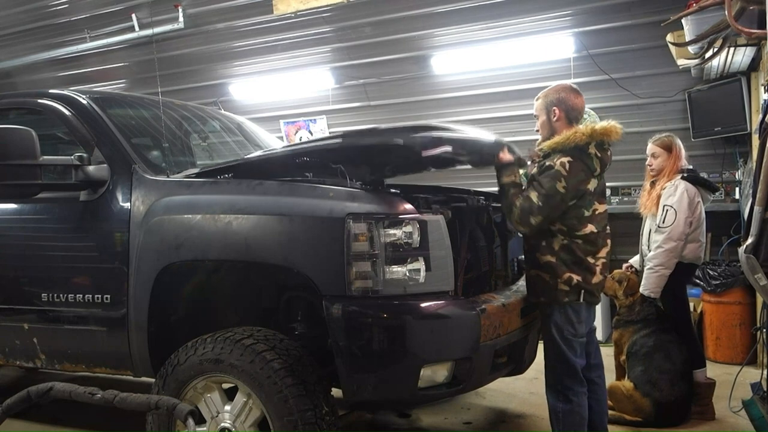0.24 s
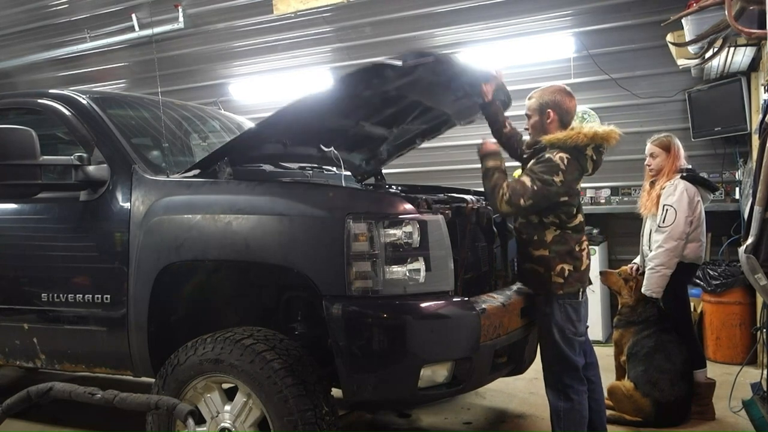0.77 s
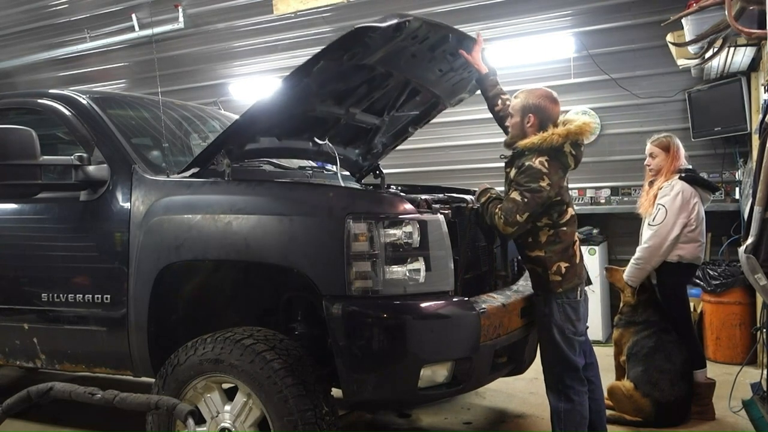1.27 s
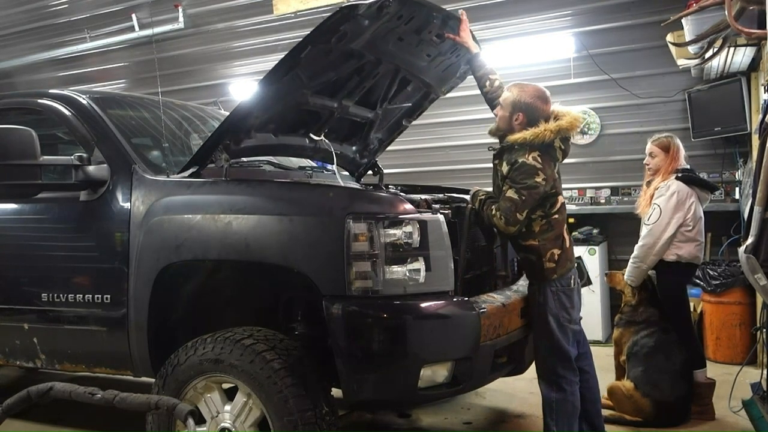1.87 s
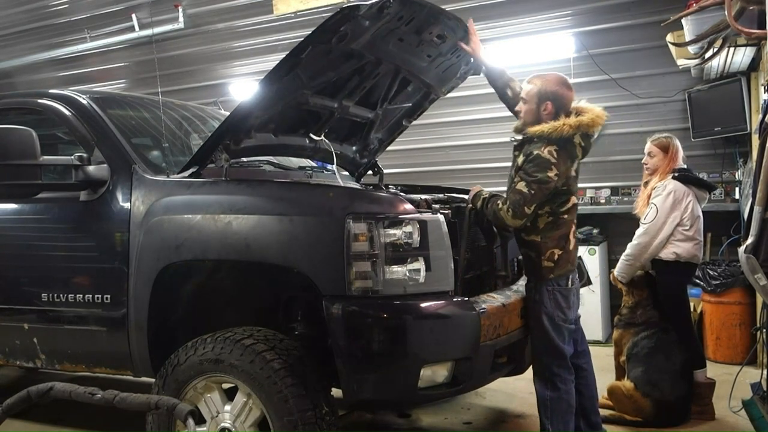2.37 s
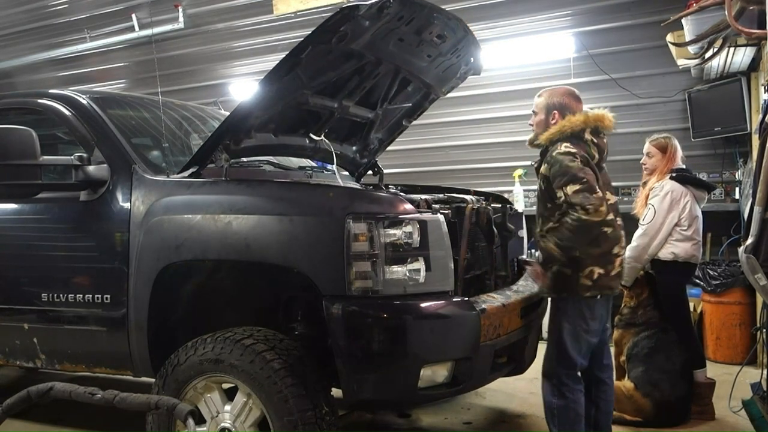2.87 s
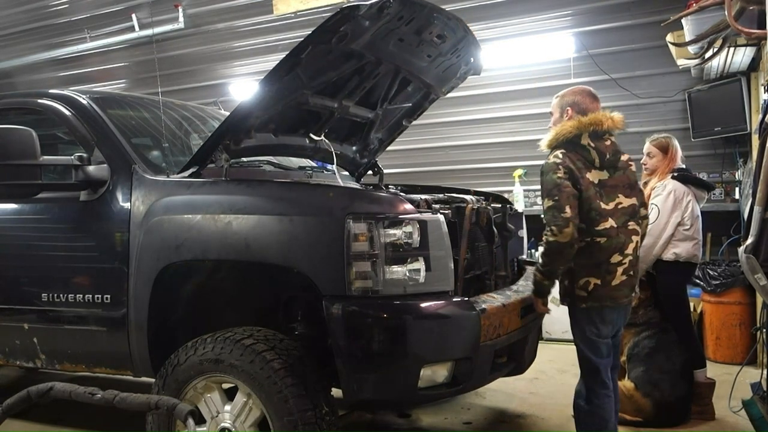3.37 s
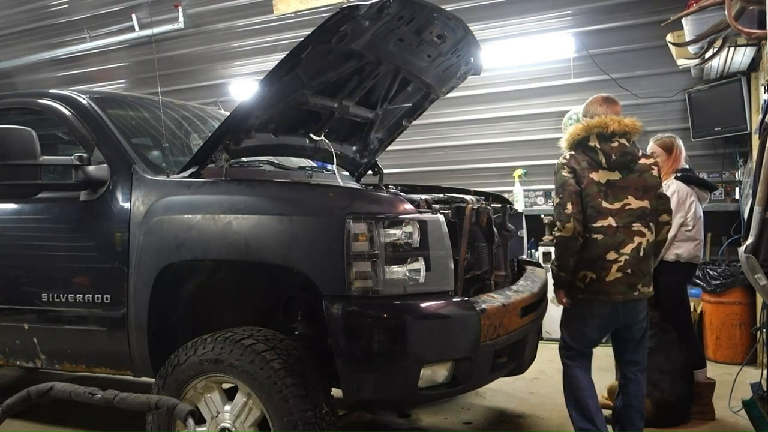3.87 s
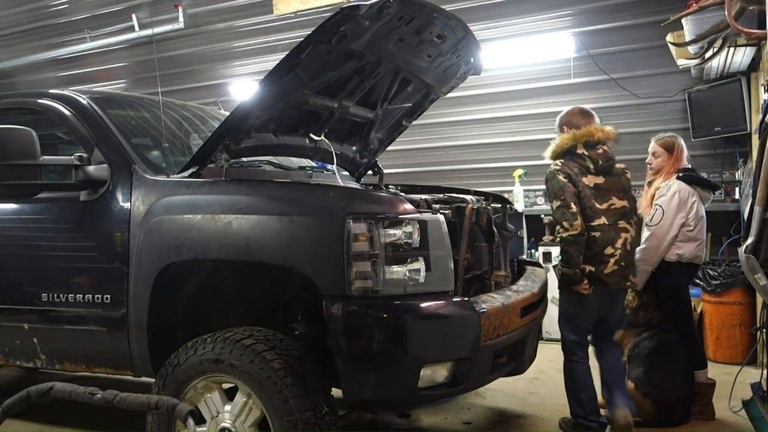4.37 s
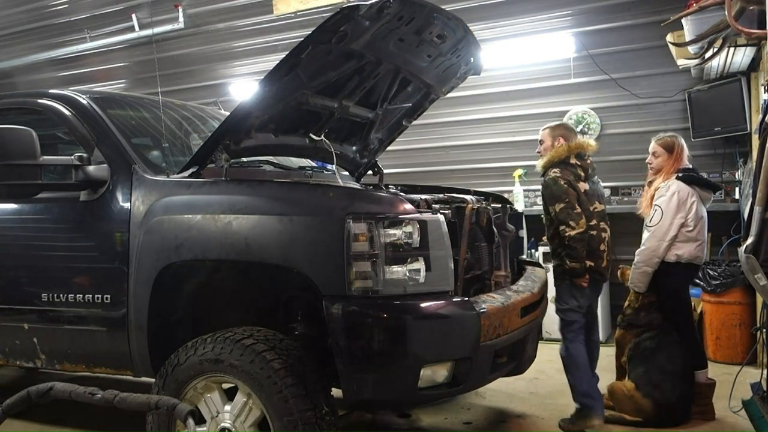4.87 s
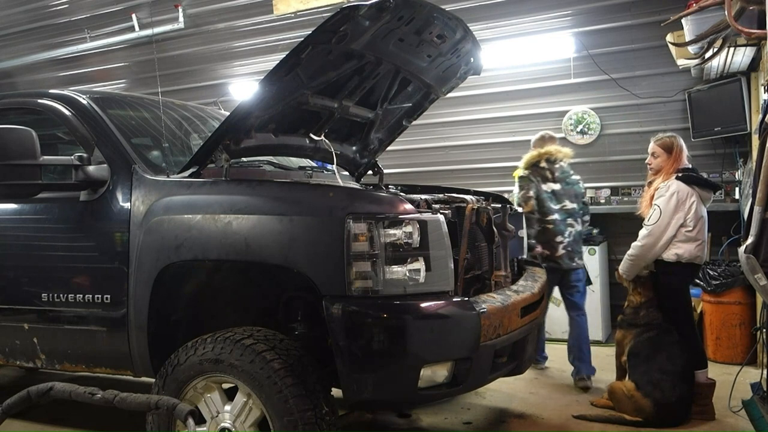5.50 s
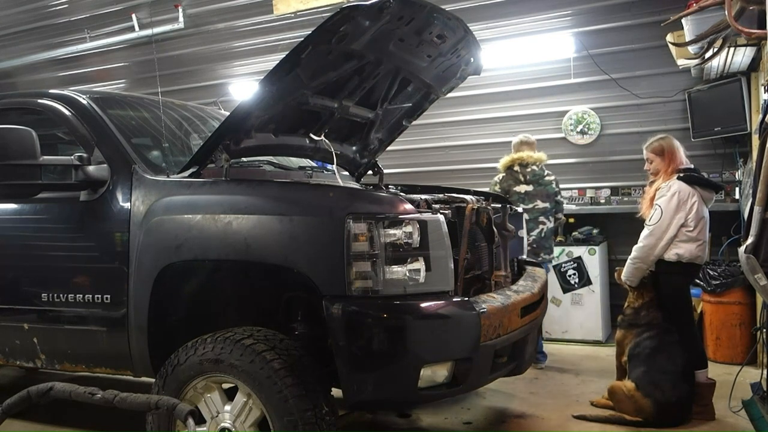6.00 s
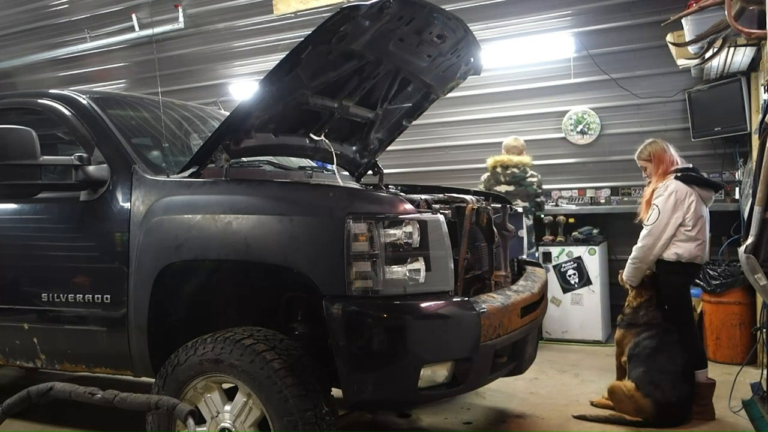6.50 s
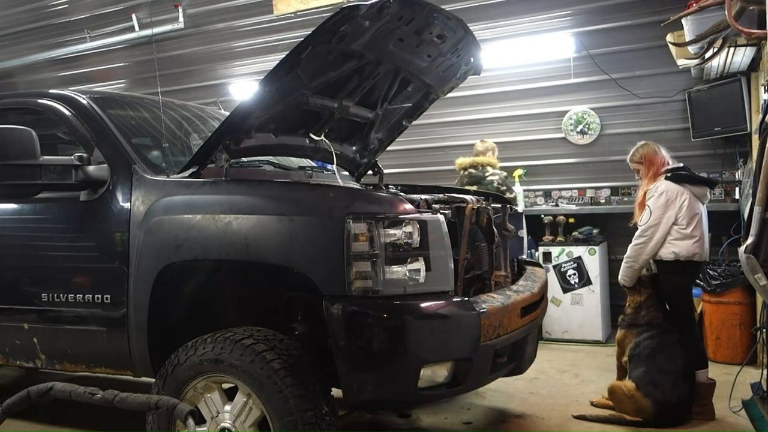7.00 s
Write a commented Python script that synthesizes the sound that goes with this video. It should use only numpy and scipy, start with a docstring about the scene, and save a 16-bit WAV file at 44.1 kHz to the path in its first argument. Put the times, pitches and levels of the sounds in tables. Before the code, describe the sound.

A sharp metallic clack opens a truck's hood over the low, pulsing hum and airy rush of a garage fan. Faint jacket rustling and a muffled bump from the hinges follow, then light, uneven footsteps on concrete. Finally comes a quick scrape, a rattle of metal tools and a loud bouncing knock on a workbench. Everything sounds somewhat distant in stereo, with a short echo off the metal walls.

```python
"""A metal-lined garage, heard through a two-port stereo microphone, with more room than direct sound.
A fan rushes, booms and whines through its housing while its motor hums against the mains.
A truck's hood latch lets go with a clack and the hood swings up to a dull stop. A jacket rustles and
shoes scuff over the concrete to a workbench, where something is dragged, tools clink and rattle,
and something heavy is set down and bounces. Each blow or scrape rings a body, then the garage."""
import sys
import numpy as np
from scipy import signal
from scipy.fft import rfft, irfft, next_fast_len
from scipy.io import wavfile
from scipy.ndimage import uniform_filter1d, minimum_filter1d

SR = 44100
rng = np.random.default_rng(int(sys.argv[2]) if len(sys.argv) > 2 else 0)


def unload_audio(sound):
    """Save the sound as a 16-bit wav file, at the path given as the first command line argument."""
    columns = np.transpose(np.atleast_2d(sound))
    # keep every value between -1 and 1, then stretch to whole-number steps
    steps = np.round(np.clip(columns, -1, 1) * 32767)
    wavfile.write(sys.argv[1], SR, steps.astype(np.int16))


N = 319725

# the fan's rush of air: frequency_hz, gain_db
AIR_SPECTRUM = [(30, -23), (50, -11), (64, -2), (76, 3.5), (112, -5.5), (165, -5), (195, -13.5),
                (265, -17.5), (400, -9), (640, -23.5), (1100, -19), (1450, -25), (2600, -28), (4700, -47)]
# resonances of the fan and its housing: pitch_hz, width_hz, gain_db
HOUSING_MODES = [(156, 20, 6), (221.6, 20, 8), (294, 13.7, 11), (315.5, 43, 12.5), (430, 14, 4.5),
                 (552, 32.4, 12), (717, 69, 12.5), (984, 157, 4.5), (1260, 13, 10.5), (1647, 46, 4),
                 (3327, 42, 10)]
# slow course of the fan's boom and of its whine: time_s, level_db
BOOM_LEVELS = [(0, -32), (2.15, -33), (2.4, -37.5), (3.9, -36), (4.15, -29.5), (4.7, -32.5), (6.25, -31.5),
               (6.4, -24.5), (6.55, -32.5), (7.25, -30.5)]
WHINE_LEVELS = [(0, -59), (1.2, -63), (1.75, -57.5), (2.2, -60), (2.7, -56.5), (5.2, -56.5), (6.2, -62),
                (7.25, -65)]
# motor hum, on the mains and on the shaft speed: harmonic_number, level_db
MAINS_HARMONICS = [(1, -35.6), (2, -49.8)]
SHAFT_HARMONICS = [(1, -36.3), (3, -47.6), (4, -50), (5, -42.5), (8, -53)]
# the microphone's own hiss: frequency_hz, gain_db
HISS_SPECTRUM = [(1000, -0.5), (8000, -13.5), (12000, -6), (15500, -4.5)]

# blows: start_s, level_db, contact_s, tilt_db_per_octave
LATCH_BLOWS = [(.0478, -18, 0.0093, 4), (.054, -19.5, .003, 1.5), (.065, -20.5, 0.0018, -4.5),
               (.077, -20, 0.007, -7.5), (.121, -31, 0.0031, 1), (.19, -38, 0.016, -8.5),
               (.435, -32, 0.012, -18.5)]  # in latch and hood
THUMP_BLOWS = [(1.85, -31, 0.05, -1), (4.505, -35, .0005, -2), (4.866, -37, 0.00088, 0)]  # the hinges at their stop, then two heels
CLINK_BLOWS = [(6.841, -33, 0.0049, -2)]  # a small metal tool
RATTLE_BLOWS = [(6.843, -28, 0.01, -0.5), (6.885, -33, 0.0079, -1), (6.9285, -24, .003, -0.5),
                (6.968, -25, 0.018, 0.5), (7.0, -30, .006, 0.5)]  # tools against each other
BENCH_BLOWS = [(7.0405, -16.5, 0.0035, 1), (7.048, -19.5, .002, 1.5), (7.078, -20, .004, 0.5),
               (7.095, -22, 0.0014, 0)]  # something heavy on the bench
# moves of the arms in a winter jacket: middle_s, level_db, length_s
ARM_MOVES = [(.4, -59, 0.91), (1.2, -63, .6), (2.57, -61, 0.51), (2.87, -62, .2), (3.38, -58, .16),
             (4.58, -54, 0.22), (4.98, -59, .3)]
# soles on concrete: start_s, level_db, slide_s, tilt_db_per_octave, rasp_hz
SCUFFS = [(3.083, -39, 0.013, -4, 2580), (3.125, -40.5, 0.005, -3, 2180), (3.604, -43.5, 0.012, -2.5, 2570),
          (4.163, -37, 0.019, -0.5, 2500), (4.228, -38.5, 0.0077, -5.5, 2310),
          (4.42, -49.5, 0.0019, -4.5, 2900), (4.578, -41, 0.0025, -8, 1930), (5.0, -51, 0.0066, -6.5, 3050),
          (5.406, -36.5, 0.01, 2.5, 2190), (5.495, -43.5, 0.0021, -3, 1200),
          (5.635, -51.5, 0.0098, -1, 2600), (6.036, -36.5, 0.01, 1, 2850), (6.08, -40, 0.011, -0.5, 2700)]
# something dragged on the bench: start_s, level_db, slide_s, tilt_db_per_octave
DRAG_SLIDES = [(6.585, -48, 0.009, 9), (6.607, -35.5, 0.0021, 4), (6.622, -26.5, 0.009, 0),
               (6.668, -28, 0.0031, -3.5)]

# broad colour of each thing struck or rubbed: frequency_hz, gain_db
HOOD_SPECTRUM = [(120, -18), (280, -10), (460, 0), (620, -8), (850, -11), (1200, -1), (1900, -5),
                 (2700, -14), (3600, -22.5), (4600, -29), (8000, -43), (15500, -53)]
CLOTH_SPECTRUM = [(1000, -10), (3000, 4), (6000, -3), (9000, 0), (15000, -1)]
THUMP_SPECTRUM = [(100, -17), (300, 10.5), (700, -1), (1300, -7.5), (3000, -27), (15500, -69)]
SOLE_SPECTRUM = [(150, -29), (500, -14.5), (1000, -11.5), (1500, -7.5), (2000, -5), (2900, -5.5),
                 (3900, -10.5), (5500, -13.5), (8000, -16.5), (11000, -20), (15500, -24)]
DRAG_SPECTRUM = [(200, -11), (520, -7), (900, -9.5), (1450, -11), (1650, -4.5), (2000, 0.5), (2550, -1),
                 (3200, -6.5), (3650, -7.5), (4300, -12), (7000, -20), (10000, -28), (15500, -34)]
CLINK_SPECTRUM = [(1000, -11), (2800, 6), (5500, -9), (9000, -15), (15500, -14)]
RATTLE_SPECTRUM = [(150, -11), (350, 3), (700, -5.5), (950, -5), (2000, -4.5), (2800, -8), (3800, -17),
                   (6000, -26.5), (10000, -31.5), (15500, -31)]
BENCH_SPECTRUM = [(120, -9), (250, -6), (380, 2.5), (750, 0), (1100, -0.5), (2000, -2.5), (2700, -7),
                  (3400, -20.5), (4200, -21), (6500, -30), (10000, -33), (15500, -34)]
# resonances standing on those colours: pitch_hz, width_hz, gain_db
HOOD_RESONANCES = [(308, 29, 12), (423, 13, 4), (469, 35, 5), (1166, 29, 9), (1420, 34, 4), (1590, 30, 5),
                   (1665, 48, 8.5), (1760, 87, 4), (1886, 30, 7.5), (2140, 95, 9.5), (2380, 44, 4),
                   (2630, 32, 10.5), (2700, 62, 13), (2850, 40, 4), (3280, 75, 8), (3490, 91, 10.5),
                   (3640, 60, 7)]
CLINK_RESONANCES = [(4500, 590, 13), (7760, 750, 15), (10700, 1000, 13)]
RATTLE_RESONANCES = [(1200, 70, 5), (1330, 90, 7), (1925, 56, 6)]
BENCH_RESONANCES = [(355, 19, 8.5), (385.4, 12, 10.5), (527, 26, 5.5), (716, 75, 10.5), (830, 24, 5),
                    (922, 27, 3), (1233, 27, 1), (1670, 40, 2.5), (1945, 190, 6), (3230, 80, 10)]

# the garage's reverberation time: frequency_hz, t60_s
GARAGE_DECAY = [(150, 0.42), (500, 0.68), (1400, 0.52), (3500, 0.59), (8000, 0.55), (15000, 0.62)]
# unshared against shared sound at the two ports: frequency_hz, side_over_mid_db
PORT_SPREAD = [(60, -81), (150, -39.5), (320, -20), (700, -15.5), (1400, -10.5), (2600, -10.5), (4500, 1.5),
               (9000, -4), (15000, 10)]
# the ports' unequal sensitivity: frequency_hz, left_over_right_db
PORT_BALANCE = [(700, 0.3), (1400, -0.3), (2600, -1.4), (4000, -4.5), (8000, -0.5), (14000, 0.7)]


def from_db(db):
    return 10 ** (np.asarray(db) / 20)


def unit_rms(x):
    return x / np.sqrt(np.mean(x ** 2) + 1e-20)


def curve_at(points, hz):
    """Joins (frequency_hz, value) points on a log-frequency axis."""
    point_hz, value = np.transpose(points)
    return np.interp(np.log(hz + 1), np.log(point_hz + 1), value)


def slow_gain(levels):
    """Joins (time_s, level_db) points into a gain for every sample."""
    return from_db(np.interp(np.arange(N) / SR, *np.transpose(levels)))


def body_db(spectrum, modes, hz):
    """A broad spectrum with resonance peaks standing on it."""
    peaks_db = sum(db / (1 + (2 * (hz - pitch) / width) ** 2) for pitch, width, db in modes)
    return curve_at(spectrum, hz) + peaks_db


def diffuse(gain_db=lambda hz: 0, size=N):
    """Noise from all around, as two close ports hear it: alike in the bass, apart in the treble."""
    padded = next_fast_len(size)
    hz = np.fft.rfftfreq(padded, 1 / SR)
    mid, side = rfft(rng.standard_normal((2, padded)))
    spread = from_db(curve_at(PORT_SPREAD, hz))
    ports = np.array([mid + spread * side, mid - spread * side]) / np.sqrt(1 + spread ** 2)
    return irfft(ports * from_db(gain_db(hz)), padded)[:, :size]


def narrow_band(pitch_hz, width_hz):
    """Turbulence heard through one resonance, at rms 1; it swells and sinks by chance."""
    return unit_rms(diffuse(lambda hz: -20 * np.log10(1 + (2 * (hz - pitch_hz) / width_hz) ** 2)))


def fan(level_db=-30, rolloff_hz=6500):
    """Air rushes through the resonant housing and dies away in the top octaves."""
    def colour_db(hz):
        return body_db(AIR_SPECTRUM, HOUSING_MODES, hz) - 10 * np.log10(1 + (hz / rolloff_hz) ** 4)
    return from_db(level_db) * unit_rms(diffuse(colour_db))


def fan_boom():
    """Turbulent air feeds the fan's deepest resonance, which flutters about its slow level."""
    band = narrow_band(pitch_hz=148.7, width_hz=16)
    running_rms = np.sqrt(uniform_filter1d(band[0] ** 2, size=16000))
    return band / running_rms * slow_gain(BOOM_LEVELS)


def fan_whine():
    """A thin, fuzzy whistle from the running machine; it comes up after the hood and sinks again."""
    return narrow_band(pitch_hz=2564, width_hz=37) * slow_gain(WHINE_LEVELS)


def motor(mains_hz=60.02, shaft_hz=56.89, in_phase_s=0.299):
    """The shaft slips a little behind the mains, so their two hums beat three times a second."""
    t = np.arange(N) / SR - in_phase_s
    hum = np.zeros(N)
    for hz, harmonics in [(mains_hz, MAINS_HARMONICS), (shaft_hz, SHAFT_HARMONICS)]:
        for number, level_db in harmonics:
            hum += np.sqrt(2) * from_db(level_db) * np.cos(2 * np.pi * number * hz * t)
    return hum


def microphone_hiss(level_db=-57.5):
    """The microphone's own faint, steady noise."""
    return from_db(level_db) * unit_rms(diffuse(lambda hz: curve_at(HISS_SPECTRUM, hz)))


def strike(contact_s, chatter=0.21, bounces_per_s=2500, size=8192):
    """The force of one sharp impact, then of loose parts chattering to rest."""
    t = np.arange(size) / SR
    bounces = rng.standard_normal(size) * (rng.random(size) < bounces_per_s / SR)
    return (t == 0) + chatter * bounces * np.exp(-t / contact_s)


def ring(force, spectrum, modes, tilt, size=16384):
    """A force rings a body; harder contact tilts its colour brighter, in dB per octave."""
    hz = abs(np.fft.fftfreq(size, 1 / SR))
    octaves = np.log2(np.maximum(hz, 250) / 2000)  # pivots at 2 kHz, flat below 250 Hz
    gain = from_db(body_db(spectrum, modes, hz) + tilt * octaves)
    minimum_phase = np.exp(np.conj(signal.hilbert(np.log(gain))))
    response = np.fft.ifft(minimum_phase).real
    return signal.fftconvolve(force, response[:size // 2])


def garage(sound, direct_db, early_db=3, early_s=0.046):
    """Direct sound, early returns from floor and truck, then a dense tail from the metal walls."""
    hz, t, noise = signal.stft(diffuse(size=32768), SR, nperseg=256)
    fade_db = early_db * np.exp(-t / early_s) - 60 * t / curve_at(GARAGE_DECAY, hz)[:, None]
    tail = signal.istft(noise * from_db(fade_db), SR, nperseg=256)[1]
    response = tail / np.linalg.norm(tail[0])
    direct = from_db(direct_db)  # against the tail: lower sounds farther from the microphone
    response[1, 0] += direct  # sources on the right reach that port first
    response[0, 1] += direct
    return signal.fftconvolve(sound[None], response, axes=1)


def play(events, force, spectrum, modes, direct_db):
    """Each event rings a body in the garage; its level is its energy spread over a tenth of a second."""
    mix = np.zeros((2, N))
    for start_s, level_db, duration_s, tilt in events:
        sound = garage(ring(force(duration_s), spectrum, modes, tilt), direct_db)
        size = sound.shape[1]
        sound = from_db(level_db) * unit_rms(sound) * np.sqrt(0.1 * SR / size)
        span = mix[:, round(start_s * SR):][:, :size]
        span += sound[:, :span.shape[1]]
    return mix


def hood():
    """Well off the microphone, the latch lets go and its blows ring the truck's hood."""
    return play(LATCH_BLOWS, strike, HOOD_SPECTRUM, HOOD_RESONANCES, direct_db=-18.5)


def jacket(crinkle_db=2.5, stir_db=-74):
    """Cloth slides on cloth in uneven catches, swells with each move and never lies quite still."""
    t = np.arange(N) / SR
    power = from_db(stir_db) ** 2
    for middle_s, level_db, length_s in ARM_MOVES:
        arch = np.cos(np.pi * np.clip((t - middle_s) / length_s, -.5, .5))
        power += (from_db(level_db) * arch) ** 2
    catches = unit_rms(uniform_filter1d(rng.standard_normal(N), size=700))
    rub = diffuse(lambda hz: curve_at(CLOTH_SPECTRUM, hz)) * from_db(crinkle_db * catches)
    return unit_rms(rub) * np.sqrt(power)


def thumps():
    """Dull blows: the hinges reach their stop, and later two heels land."""
    return play(THUMP_BLOWS, strike, THUMP_SPECTRUM, [], direct_db=-10)


def slide(slide_s, grit_db=6, size=12288):
    """The force of grit catching and slipping under a pressure that swells and fades."""
    progress = np.arange(size) / SR / slide_s
    grains = rng.standard_normal(size)
    catches = from_db(grit_db * np.minimum(rng.exponential(1, size), 4))
    return grains * catches * progress * np.exp(-progress)


def steps(rasp_width_hz=750, rasp_db=6):
    """Nearer the microphone, soles scuff on concrete, each with a rasp set by how the tread catches."""
    return sum(play([scuff], slide, SOLE_SPECTRUM, [(rasp_hz, rasp_width_hz, rasp_db)], direct_db=-11)
               for *scuff, rasp_hz in SCUFFS)


def bench_drag():
    """Something scrapes over the workbench in a few quick slips."""
    return play(DRAG_SLIDES, slide, DRAG_SPECTRUM, [], direct_db=-11)


def tool_clink():
    """A small metal tool is knocked once and rings briefly in the treble."""
    return play(CLINK_BLOWS, strike, CLINK_SPECTRUM, CLINK_RESONANCES, direct_db=-15)


def tool_rattle():
    """Metal tools shift against each other, heard almost wholly by way of the room."""
    return play(RATTLE_BLOWS, strike, RATTLE_SPECTRUM, RATTLE_RESONANCES, direct_db=-23)


def bench_knocks():
    """Something heavy is set down and bounces, ringing the bench."""
    return play(BENCH_BLOWS, strike, BENCH_SPECTRUM, BENCH_RESONANCES, direct_db=-17)


def scene():
    """Fan and motor run throughout; the hood opens, steps cross the floor, work starts at the bench."""
    room_tone = fan() + fan_boom() + fan_whine() + motor() + microphone_hiss()
    truck_and_floor = hood() + jacket() + thumps() + steps()
    workbench = bench_drag() + tool_clink() + tool_rattle() + bench_knocks()
    return room_tone + truck_and_floor + workbench


def record(dry, ceiling=1.33, cutoff_hz=15850):
    """The microphone: two ports, equal only in the bass, then a soft peak limiter and a band limit."""
    hz = np.fft.rfftfreq(N, 1 / SR)
    lean = from_db(curve_at([(280, 0), *PORT_BALANCE], hz) / 2)  # even up to 280 Hz
    left_delay = np.exp(-2j * np.pi * hz / SR)  # one sample
    ports = irfft(rfft(dry) * np.array([lean * left_delay, 1 / lean]), N)
    held_peaks = -minimum_filter1d(-abs(ports).max(0), size=200)
    envelope = uniform_filter1d(held_peaks, size=200)
    limited = ports / np.sqrt(1 + (envelope / ceiling) ** 2)
    lowpass = signal.firwin(801, cutoff_hz, window=("kaiser", 9), fs=SR)
    return signal.oaconvolve(limited, lowpass[None], "same")


dry = scene()
out = record(dry)
unload_audio(out)
```